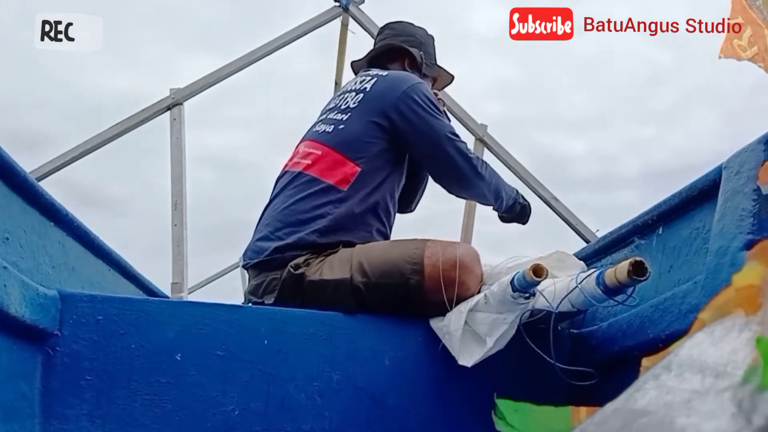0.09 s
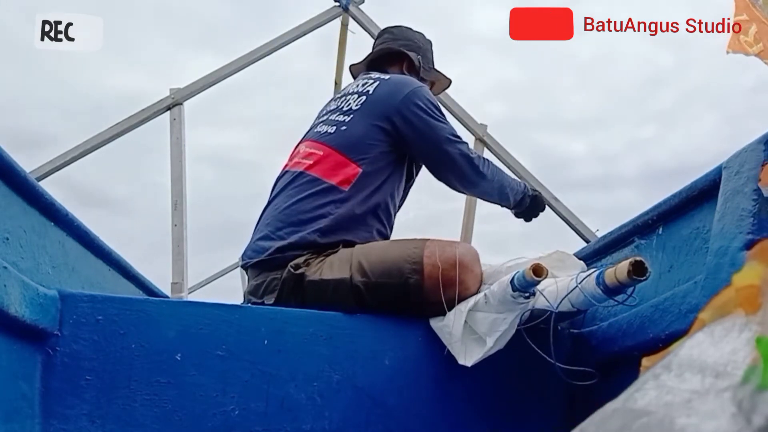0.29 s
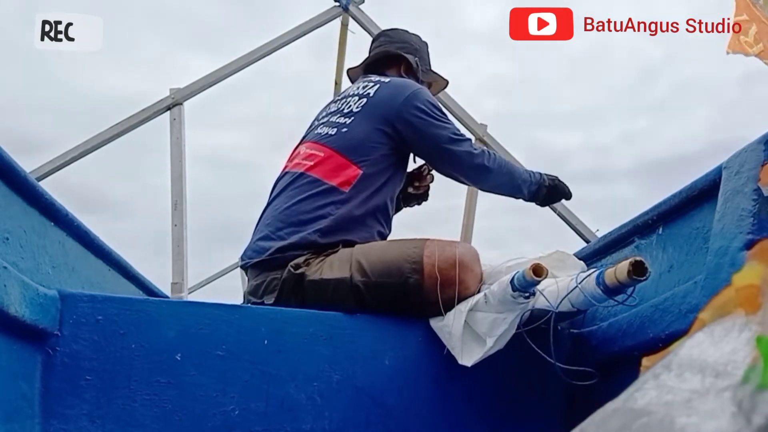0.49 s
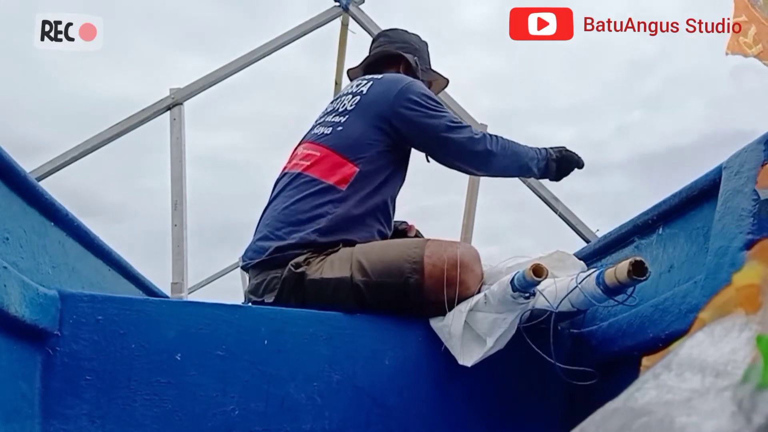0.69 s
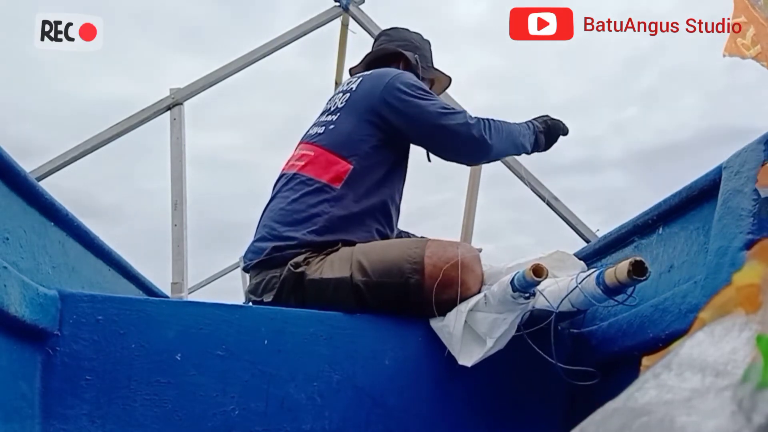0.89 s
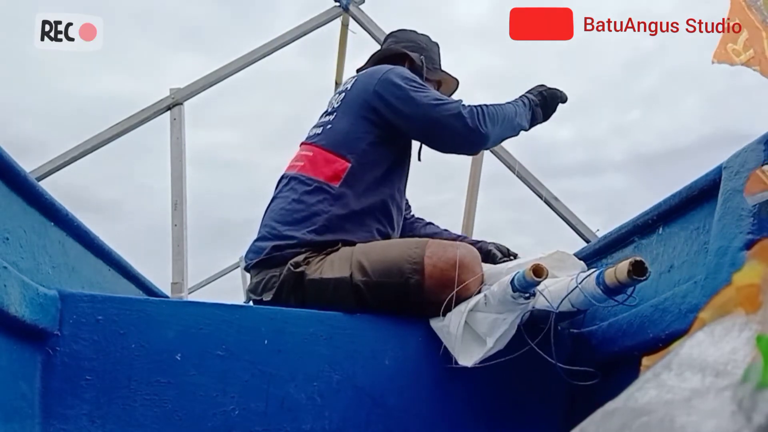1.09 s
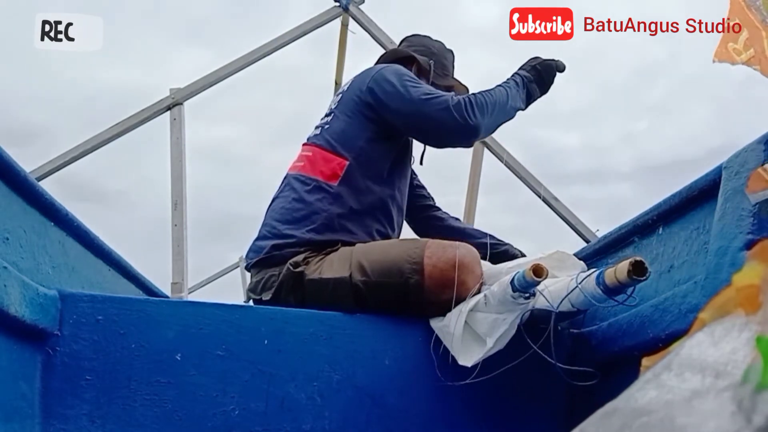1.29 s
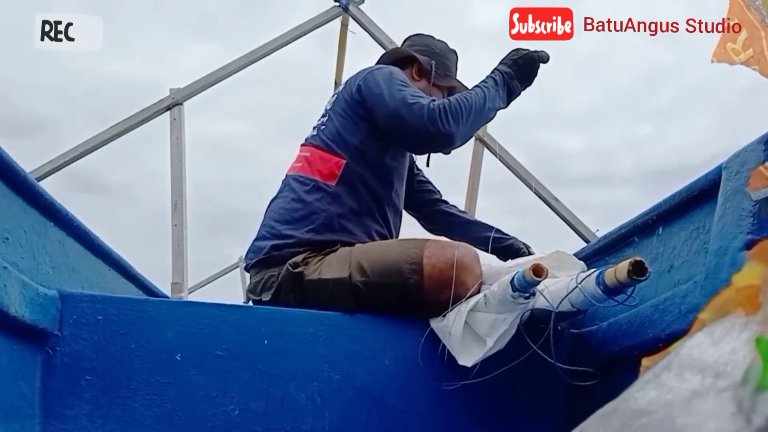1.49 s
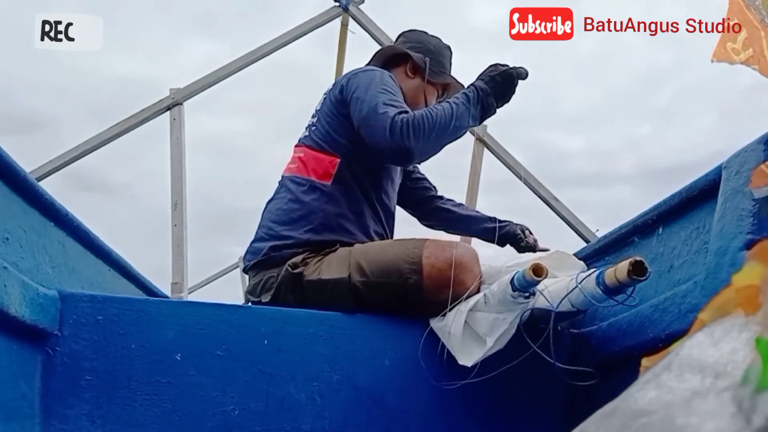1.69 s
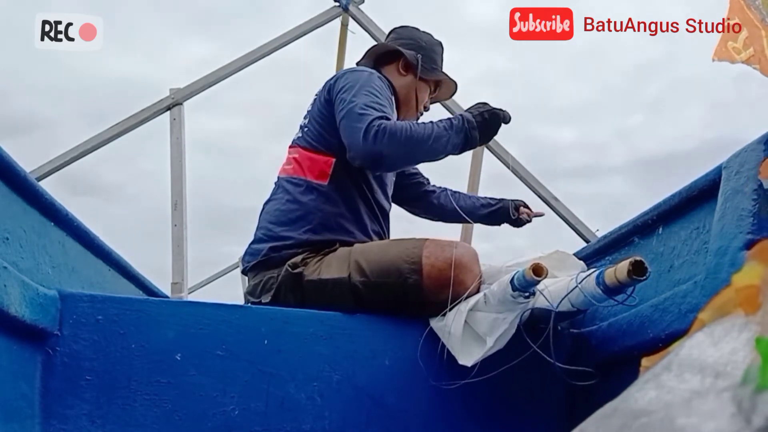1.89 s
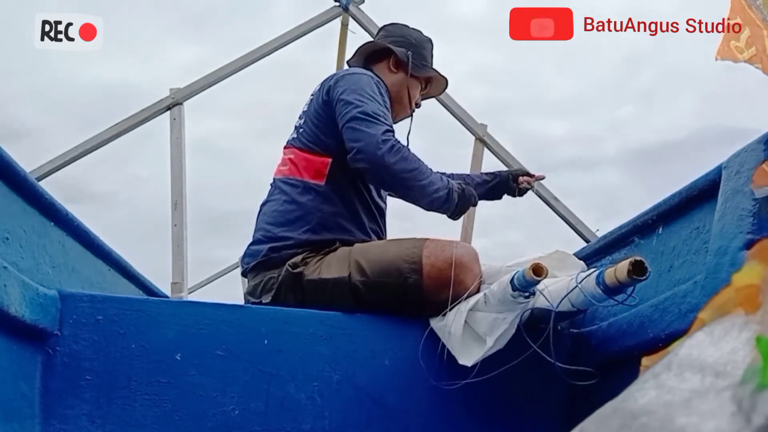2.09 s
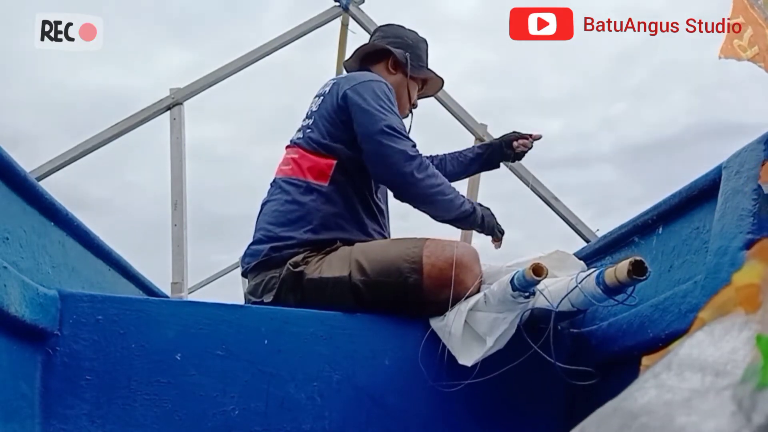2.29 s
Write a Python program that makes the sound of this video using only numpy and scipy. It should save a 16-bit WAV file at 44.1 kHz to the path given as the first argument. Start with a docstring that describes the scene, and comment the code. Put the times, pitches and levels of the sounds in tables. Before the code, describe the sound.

Water slaps and gurgles against a small wooden boat hull, with hollow knocks and brief splashes

```python
"""Wavelets against a wooden boat

Wavelets slap and gurgle against the planks of a small boat; the microphone lies on the hull.
Each slap is a short rough push, heard directly and through the hull's resonant modes.
Spray hisses in bursts of coloured noise, and ticks are snaps through a broad resonance.
An air pocket gurgles as a roughened gliding tone. Low band noise rumbles as the hull rocks,
and a faint steady wash of sea lies below."""
import sys
import numpy as np
from scipy import signal
from scipy.fft import rfft, irfft
from scipy.io import wavfile
from scipy.ndimage import uniform_filter1d

SR = 44100
rng = np.random.default_rng(int(sys.argv[2]) if len(sys.argv) > 2 else 0)


def wav_record(signal):
    """Record a signal, one row per channel, as 16-bit PCM in the file named by sys.argv[1]."""
    frames = np.transpose(np.atleast_2d(signal))
    bounded = np.clip(frames, -1, 1)
    # unit amplitude maps onto the largest positive 16-bit level
    quanta = np.round(bounded * 32767).astype(np.int16)
    wavfile.write(sys.argv[1], SR, quanta)


N = 101430  # length [samples]

LEFT_LAG_S = 0.00031  # the water is nearer the right microphone
SLAP_FADE_S, SLAP_FADE_SHARE = 0.004, 0.48  # fade time constant: fixed part, share of push length
SLAP_EVEN_CYCLES = 2.7  # the roughness is evened in level over this many cycles
SLAP_CLEAR_S = 0.028  # pushes shorter than this trap air and sound more and more as one pitch
HULL_SIDE_HZ, HULL_SIDE_DB = 610, -1  # above this the two microphones hear different planks
TICK_T60_S, TICK_Q, TICK_TREBLE_DB, TICK_SNAP = 0.03, 7.5, -19.5, 2.2
SPRAY_LOW_DB, SPRAY_HIGH_DB, SPRAY_ROUGH_DB, SPRAY_SIDE = -14, -9.5, 1, 0.94
SPRAY_PEAK_GAIN, SPRAY_PEAK_Q = 1.09, 8  # each burst favours its own centres
SPRAY_RISE_S, SPRAY_PATCH_S, SPRAY_PATCH_DB = 0.0056, 0.02, 1.8  # soft start; flicker of bands
GURGLE_WIDTH_HZ, GURGLE_ROUGH = 69, 0.52
SEA_DB, SEA_SIDE_HZ = -68.5, 500
LOW_CUT_HZ, CUTOFF_HZ = 48, 16000


def from_db(db):
    """Decibels are logarithmic: 20 dB is a factor of ten in amplitude."""
    return 10 ** (np.asarray(db) / 20)


def rms_one(x):
    """Normalisation: dividing by the root mean square gives unit rms."""
    return x / np.sqrt(np.mean(x ** 2) + 1e-20)


def filtered(order, hz, kind, x):
    """A Butterworth filter passes its band with a maximally flat response."""
    return signal.sosfilt(signal.butter(order, hz, kind, fs=SR, output="sos"), x)


def high_part(x, hz):
    """A first-order high-pass keeps what lies above its corner."""
    return filtered(1, hz, "high", x)


def panned(mid, side, pan_db):
    """Stereo by sum and difference, with a left-right level lean and a later arrival at the left."""
    lag = int(LEFT_LAG_S * SR)
    left = np.roll(mid + side, lag)
    right = mid - side
    return np.array([left, right]) * from_db([[pan_db / 2], [-pan_db / 2]])


def coloured(spectrum, count):
    """Spectral shaping: white noise is weighted in frequency, then its rows are set jointly to rms 1."""
    hz = np.fft.rfftfreq(N, 1 / SR) + 1
    point_hz, point_db = np.array(spectrum).T
    gain = from_db(np.interp(np.log(hz), np.log(point_hz), point_db, left=-90, right=-90))
    white = rng.standard_normal((count, N))
    return rms_one(irfft(rfft(white) * gain, N))


def slaps():
    """Forced and free vibration: a short band-limited push is heard directly and as hull ringing."""
    # slaps on the planks, and near 2.16 s a creak as something rubs the hull: # (time [s], level [dB], centre
    # [Hz], rise [s], push length, at least 0.004 [s], # band edge either side of centre [octaves], ringing re
    # direct push [dB], left re right [dB])
    slap_table = [(0.0, -43, 204.5, 0.002, 0.018, 0.47, -0.5, -2),
                  (0.008, -62, 652, 0.0041, 0.021, 0.3, 3.5, -3),
                  (0.064, -55, 442, 0.0089, 0.042, 0.28, 3, -1),
                  (0.183, -38.5, 190, 0.0042, 0.022, 0.47, -6, 2),
                  (0.2, -16, 329, 0.0071, 0.013, 0.56, -12, -1),
                  (0.202, -33.5, 130, 0.0058, 0.059, 0.57, -31, -1.5),
                  (0.226, -28.5, 325, 0.0058, 0.054, 0.24, -27, -0.5),
                  (0.225, -40.5, 518, 0.0055, 0.024, 0.47, -11.5, 2.5),
                  (0.291, -61.5, 993, 0.0025, 0.021, 0.53, -7.5, -1),
                  (0.344, -38, 294, 0.0077, 0.046, 1, -4, 0), (0.377, -35, 278, 0.012, 0.038, 0.64, -3, -1),
                  (0.405, -24, 659, 0.0022, 0.0033, 0.53, -7, 0),
                  (0.4106, -19.5, 543, 0.0036, 0.0071, 0.41, -6, 1.5),
                  (0.405, -45.5, 977, 0.0023, 0.081, 0.23, -9, 0),
                  (0.422, -32.5, 659, 0.0039, 0.023, 0.48, -14.5, 0.5),
                  (0.442, -37.5, 240, 0.013, 0.076, 1, -17, -1.5),
                  (0.484, -34, 312, 0.0047, 0.05, 1, -4.5, -1.5),
                  (0.479, -44.5, 1120, 0.004, 0.032, 0.68, -15, 0),
                  (0.493, -37.5, 1072, 0.0022, 0.011, 0.2, -9, 3.5),
                  (0.528, -52.5, 330, 0.0018, 0.083, 0.62, -21, -8),
                  (0.7, -57, 1770, 0.0017, 0.035, 0.19, -60.5, -4),
                  (0.883, -67, 720, 0.0017, 0.018, 0.91, -27.5, -9.5),
                  (0.995, -60.5, 500, 0.0035, 0.17, 1, -4, -1.5),
                  (1.056, -33.5, 702, 0.0018, 0.03, 0.69, -12, -2),
                  (1.057, -44.5, 314, 0.0038, 0.035, 0.86, -18, -2),
                  (1.085, -32.5, 171, 0.0066, 0.087, 0.74, -9, -0.5),
                  (1.168, -49, 500, 0.0026, 0.027, 0.8, 6, -12),
                  (1.2008, -18.5, 400, 0.00054, 0.0019, 0.97, -12.5, -3),
                  (1.211, -19, 403, 0.0019, 0.0065, 0.46, -5, 0.5),
                  (1.234, -31.5, 260, 0.0014, 0.066, 1, -8, 0.5),
                  (1.295, -57.5, 386, 0.0025, 0.075, 0.9, -23, 18),
                  (1.351, -57.5, 1120, 0.0034, 0.032, 0.14, 2, -4),
                  (1.441, -51.5, 824, 0.0079, 0.036, 0.7, -21, -0.5),
                  (1.478, -46.5, 673, 0.011, 0.073, 0.77, 1.5, 1),
                  (1.514, -27, 634, 0.00446, 0.018, 0.49, -8.5, -0.5),
                  (1.535, -37, 625, 0.0029, 0.027, 0.33, -5.5, -5),
                  (1.517, -42.5, 1226, 0.0016, 0.026, 0.39, -22, 2.5),
                  (1.518, -32.5, 234, 0.00057, 0.041, 0.67, -4.5, -0.5),
                  (1.621, -36, 880, 0.0049, 0.0049, 0.56, -22, 4),
                  (1.631, -35.5, 793, 0.0026, .016, 0.4, -13, -1),
                  (1.626, -45.5, 344, 0.001, 0.071, 0.91, -8.5, -1.5),
                  (1.659, -43.5, 798, 0.001, 0.005, 0.91, -12, -2),
                  (1.679, -46, 1000, 0.011, 0.038, 0.25, -12.5, -2.5),
                  (1.694, -56, 433, 0.0075, 0.063, 1, -0.5, 0),
                  (2.006, -29, 317, 0.0025, 0.037, 0.87, -25, 2),
                  (2.038, -36, 255, 0.002, 0.042, 0.34, 0, 0.5),
                  (2.158, -43, 492, 0.0193, 0.056, 0.09, -17, -0.5),
                  (2.157, -54, 505, 0.0148, 0.068, 0.86, -22, -2.5),
                  (2.168, -46.5, 629, 0.022, 0.028, 0.081, -12, 0),
                  (2.273, -65, 1490, 0.0015, 0.0086, 0.35, -18, -8),
                  (2.215, -51.5, 218, 0.0082, 0.051, 0.85, -4, -1.5)]
    size, settle = 32768, 4096  # samples; the noise filter settles first
    t = np.arange(size) / SR
    out = np.zeros((2, N + size))
    for s, level_db, hz, rise_s, length_s, octaves, ring_db, pan_db in slap_table:
        length_s = max(length_s, 0.004)
        fade_s = SLAP_FADE_S + SLAP_FADE_SHARE * length_s
        since_hold = np.maximum(t - rise_s - length_s / 2, 0)
        shape = np.minimum(t / rise_s, 1) * np.exp(-since_hold / fade_s)

        edges = hz * 2 ** (octaves * np.array([-1.0, 1.0]))
        rough = filtered(2, edges, "band", rng.standard_normal((2, size + settle)))
        power = uniform_filter1d(rough ** 2, int(SLAP_EVEN_CYCLES * SR / hz))
        rough = (rough / np.sqrt(power + 1e-12))[:, settle:]

        # a short push trades noise for a sine, which sounds in the middle only
        clear = np.clip(1 - length_s / SLAP_CLEAR_S, 0, 1) ** 0.5
        pitch = np.sqrt(2) * np.sin(2 * np.pi * hz * t) * [[1], [0]]
        push = rough * np.sqrt(1 - clear ** 2) + clear * pitch
        force = filtered(2, edges, "band", push * shape + 1e-18)

        # an impulse halfway up the rise, in the same band, sets the hull ringing
        impulse = np.arange(size) == int(rise_s * SR / 2)
        ringing = hull_rings(filtered(2, edges, "band", impulse + 1e-18))
        loud = int((rise_s + length_s) * SR)
        match = force[:, :loud].std() / ringing[0, :loud].std()
        mid, side = force + from_db(ring_db) * ringing * match
        side = from_db(HULL_SIDE_DB) * high_part(side, HULL_SIDE_HZ)
        i = int(s * SR)
        out[:, i:i + size] += from_db(level_db) * panned(mid, side, pan_db)
    return out[:, :N]


def hull_rings(blow):
    """Modal superposition: the blow drives damped two-pole resonators, summed as middle and side."""
    # modes of the hull: (frequency [Hz], level [dB], decay by 60 dB [s])
    modes = [(55.3, -22, 0.55), (125, -5.5, 0.19), (130, 11.5, 0.18), (181.8, 8.5, 0.39), (245.1, 7, 0.22),
             (328, -5, 0.64), (384, -28, 0.34), (474, -2.5, 0.074), (503, -12, 0.28), (621, -13, 0.44),
             (781, -12.5, 0.11), (986, -2.5, 0.089), (1125, -7, 0.048)]
    out = 0
    for k, (hz, level_db, t60) in enumerate(modes):
        r = from_db(-60 / (t60 * SR))  # decay per sample
        poles = [1, -2 * r * np.cos(2 * np.pi * hz / SR), r * r]
        ring = signal.lfilter([1, 0, -1], poles, blow)
        # middle alternates in sign; the side share is drawn anew for each blow
        strength = np.array([[(-1) ** k], [rng.standard_normal()]])
        out = out + strength * from_db(level_db) * ring
    return out


def spray():
    """Noise bursts: body and treble noise, peaked at their own centres, hold and decay exponentially."""
    # bursts of spray: (time [s], level [dB], treble re body [dB], decay by 60 dB [s],
    # left re right [dB], hold from onset [s], body centre [Hz], treble centre [Hz])
    bursts = [(0.177, -21, -19.5, 0.17, 0.5, 0.015, 2750, 4030),
              (0.1962, -28, -11, 0.14, -0.5, 0.019, 2900, 6700),
              (0.285, -43.5, -48, 0.23, 0.5, 0.0066, 2120, 3860),
              (0.3722, -35.5, -19, 0.34, 0.5, 0.031, 2940, 3900),
              (0.405, -48.5, 2.5, 0.15, -3.5, 0.013, 2484, 6700),
              (0.43, -33.5, -9, 0.35, 1, 0.016, 2340, 8100),
              (0.4813, -36.5, -8, 0.059, -1, 0.026, 1900, 7100),
              (0.5048, -35, -25, 0.11, -0.5, 0.029, 1550, 3780),
              (0.704, -50.5, -16, 0.31, 1, 0.011, 1733, 7450),
              (0.773, -44, -18, 0.12, -2, 0.016, 2210, 7140),
              (0.8756, -46.5, -11.5, 0.19, -1.5, 0.0082, 2600, 7230),
              (0.937, -62, -16.5, 0.22, 31.5, 0.014, 2780, 7080),
              (0.9912, -40.5, -4.5, 0.24, -3, 0.0055, 2540, 8000),
              (1.051, -41.5, -13.5, 0.27, -6, 0.025, 1610, 4220),
              (1.078, -28, -49, 0.066, -2, 0.023, 2520, 3970),
              (1.094, -37.5, -10, 0.26, -5.5, 0.018, 2570, 6900),
              (1.1145, -33.5, -13, 0.69, 0.5, 0.029, 1630, 3900),
              (1.1648, -28, -16, 0.27, -8.5, 0.01, 2400, 7260),
              (1.1965, -18.5, -20, 0.2, -3.5, 0.0071, 2140, 7090),
              (1.24, -27, -16, 0.095, -3, 0.0045, 2140, 3740),
              (1.2516, -27.5, -14.5, 0.47, -5, 0.011, 2820, 8370),
              (1.299, -24, -18, 0.14, -2, 0.012, 2430, 4350),
              (1.3663, -34, -17.5, 0.1, 0.5, 0.016, 2720, 8360),
              (1.4777, -38.5, -18, 0.14, 1, 0.047, 2075, 4250),
              (1.512, -62.5, 9.5, 0.12, -5, 0.016, 1650, 7160),
              (1.62, -35.5, -11.5, 0.3, 0.5, 0.022, 1650, 4340),
              (1.647, -40, -57, 0.099, 3.5, 0.037, 2380, 4640),
              (1.7043, -44, -22, 0.18, -1, 0.015, 1810, 3860),
              (1.751, -48.5, -5, 0.061, -4, 0.0054, 2830, 6600),
              (1.831, -54, -19, 0.088, -4, 0.021, 2384, 7380),
              (1.9707, -50, -12, 0.15, 0.5, 0.029, 1960, 4800),
              (1.9942, -27.5, -22.5, 0.23, 0, 0.021, 2240, 7300),
              (2.073, -36, -13, 0.21, 5.5, 0.014, 2950, 4050),
              (2.086, -27.5, -17, 0.14, -1.5, 0.016, 1800, 4600),
              (2.178, -53, -25, 0.15, 0, 0.017, 2800, 4120),
              (2.216, -47, -17.5, 0.29, 0.5, 0.018, 1750, 3900),
              (2.274, -44.5, -13.5, 0.22, 0, 0.0086, 1720, 8900)]
    # spectrum of the body: (frequency [Hz], relative density [dB per Hz])
    body_spectrum = [(410, -7.5), (700, 1.5), (1420, -6), (1750, -3.5), (2610, 1), (2820, -6.5),
                     (3370, -13.5), (4130, -18.5), (4500, -32.5), (5850, -32), (9900, -120)]
    # spectrum of the treble: (frequency [Hz], relative density [dB per Hz])
    treble_spectrum = [(2060, -47), (3500, -17.5), (3940, -1), (4410, -4.5), (5550, -6), (7260, -0.5),
                       (9200, -6.5), (9980, -11), (15500, -24)]
    size = 16384
    t = np.arange(size) / SR
    out = np.zeros((2, N + size))
    beds = []
    for spectrum, level_db in ((body_spectrum, SPRAY_LOW_DB), (treble_spectrum, SPRAY_HIGH_DB)):
        wander = rms_one(uniform_filter1d(rng.standard_normal(N), size=120))
        grain = from_db(SPRAY_ROUGH_DB * wander)  # fast level grain
        beds.append(from_db(level_db) * grain * patchy(coloured(spectrum, count=2)))

    starts = rng.integers(0, N - size, len(bursts))  # each burst takes a random stretch of noise
    for (s, level_db, treble_db, t60, pan_db, hold_s, low_hz, high_hz), start in zip(bursts, starts):
        burst = 0
        for bed, hz, gain_db in zip(beds, (low_hz, high_hz), (0, treble_db)):
            piece = bed[:, start:start + size]
            peak = signal.lfilter(*signal.iirpeak(hz, SPRAY_PEAK_Q, fs=SR), piece)
            burst = burst + from_db(gain_db) * (piece + SPRAY_PEAK_GAIN * peak)
        rise = np.minimum(t / SPRAY_RISE_S, 1)
        fade = from_db(level_db - 60 * np.maximum(t - hold_s, 0) / t60)
        mid, side = burst * rise * fade
        i = int(s * SR)
        out[:, i:i + size] += panned(mid, SPRAY_SIDE * side, pan_db)
    return out[:, :N]


def patchy(x):
    """Independent band modulation: each third-octave band flickers quickly on its own."""
    out, edges = 0, np.geomspace(500, 17000, 16)
    for low, high in zip(edges, edges[1:]):
        smooth = uniform_filter1d(rng.standard_normal(N), int(SPRAY_PATCH_S * SR))
        flicker = rms_one(uniform_filter1d(smooth, size=100))
        out = out + from_db(SPRAY_PATCH_DB * flicker) * filtered(2, [low, high], "band", x)
    return out


def ticks():
    """Impulse response: a snap and decaying crackle excite a broad resonance, with some bare treble."""
    # ticks where a drop or plank edge snaps:
    # (time [s], peak of the middle signal [dB], centre [Hz], left re right [dB])
    tick_table = [(0.185, -36, 2580, 1), (0.6779, -55, 2020, -6), (0.7051, -53, 1750, 2),
                  (0.7781, -50, 1560, 2.5), (0.8814, -55.5, 2680, -0.5), (0.9951, -45, 2350, -6),
                  (1.0925, -41.5, 2330, -1), (1.169, -38.5, 2480, -6), (1.1793, -40.5, 2430, -3.5),
                  (1.2035, -37.5, 2310, 5), (1.243, -39, 2220, 3.5), (1.3034, -36, 2630, -7),
                  (1.6255, -48.5, 1820, 7), (1.6596, -50, 2570, 4), (2.277, -53.5, 1790, 10)]
    size = 4096
    out = np.zeros((2, N + size))
    fade = from_db(-60 * np.arange(size) / SR / TICK_T60_S)
    for s, peak_db, hz, pan_db in tick_table:
        crackle = rng.standard_normal((2, size)) * fade
        crackle[0, 0] += 4 * TICK_SNAP
        body = signal.lfilter(*signal.iirpeak(hz, TICK_Q, fs=SR), crackle)
        treble = filtered(1, (5000, 10000), "band", crackle)
        tick = body + from_db(TICK_TREBLE_DB) * treble
        mid, side = tick / np.abs(tick[0]).max()
        i = int(s * SR)
        out[:, i:i + size] += from_db(peak_db) * panned(mid, 0.2 * side, pan_db)
    return out[:, :N]


def gurgle():
    """Frequency modulation: phase integrates the pocket's pitch, and slow complex noise roughens it."""
    # an air pocket under the planks gurgles up and sinks again: (time [s], pitch [Hz], level [dB])
    pocket = [(0.023, 247, -51.5), (0.047, 314, -42), (0.064, 381, -36), (0.077, 484, -40.5),
              (0.092, 397, -45), (0.106, 342, -49), (.125, 330, -61)]
    s, hz, level_db = np.transpose(pocket)
    t = np.arange(N) / SR
    slow = rms_one(filtered(2, GURGLE_WIDTH_HZ, "low", rng.standard_normal((2, N))))
    roughness = 1 + GURGLE_ROUGH * (slow[0] + 1j * slow[1])
    phase = 2 * np.pi * np.cumsum(np.interp(t, s, hz)) / SR
    tone = (roughness * np.exp(1j * phase)).real
    tone = tone * from_db(np.interp(t, s, level_db, left=-200, right=-200))
    return panned(tone, 0 * tone, -0.88)


def rumble():
    """Amplitude modulation: the rocking hull's low band noise swells and ebbs, alike in both channels."""
    # level of the hull's low rumble: (time [s], level [dB])
    rocking = [(0.0, -55.5), (0.04, -56.5), (0.13, -73), (0.26, -43), (0.36, -62.5), (0.47, -41),
               (0.861, -83), (1.01, -76), (1.11, -49), (1.29, -38.5), (1.328, -51.5), (1.4, -49),
               (1.441, -56), (1.98, -84), (2.02, -46.5), (2.16, -67.5), (2.27, -57.5), (2.3, -76)]
    s, level_db = np.transpose(rocking)
    noise = filtered(3, (39.3, 74), "band", rng.standard_normal(N + SR))[SR:]  # settled
    return from_db(np.interp(np.arange(N) / SR, s, level_db)) * rms_one(noise)


def sea():
    """Diffuse field: a faint steady wash whose channels differ more in the treble."""
    # spectrum of the wash: (frequency [Hz], relative density [dB per Hz])
    sea_spectrum = [(15, -23), (25, 2), (210, 4), (946, -11.5), (1030, -7.5), (1110, -13.5), (1620, -15.5),
                    (2240, -12.5), (3350, -23.5), (3630, -28), (6560, -25), (11200, -29.5), (15500, -34.5)]
    mid, side = coloured(sea_spectrum, count=2)
    return from_db(SEA_DB) * panned(mid, high_part(side, SEA_SIDE_HZ), -0.46)


def scene():
    """Superposition: the pressures of all sources add."""
    return slaps() + spray() + ticks() + gurgle() + rumble() + sea()


def record(dry):
    """Band limiting: the lowest bass falls away and the top is cut steeply."""
    thin = filtered(3, LOW_CUT_HZ, "high", dry)
    return signal.sosfilt(signal.cheby2(24, 60, CUTOFF_HZ, fs=SR, output="sos"), thin)


dry = scene()
out = record(dry)
wav_record(out)
```